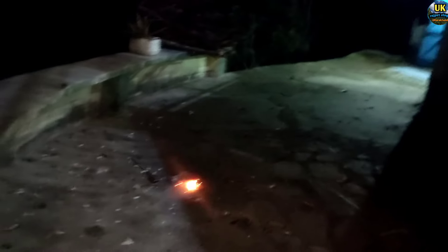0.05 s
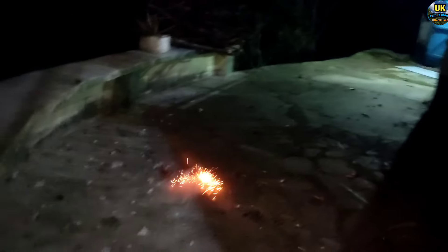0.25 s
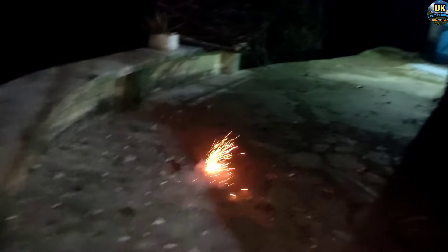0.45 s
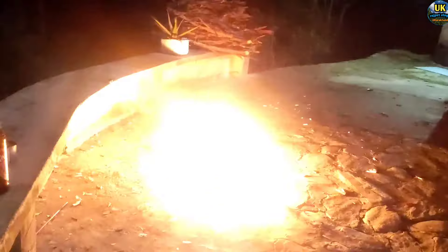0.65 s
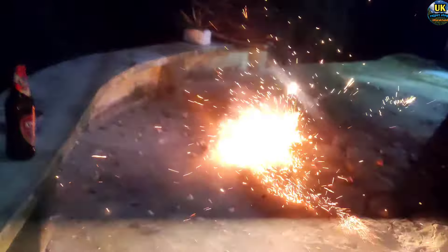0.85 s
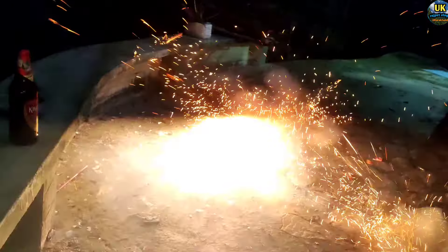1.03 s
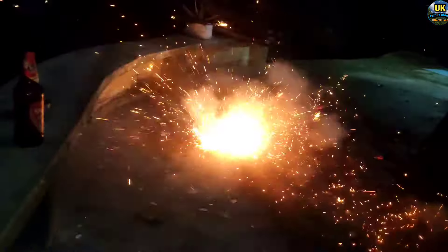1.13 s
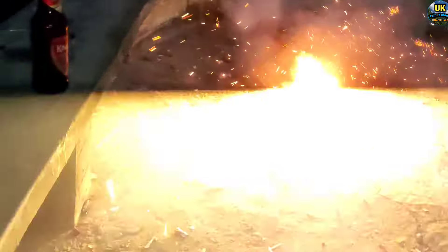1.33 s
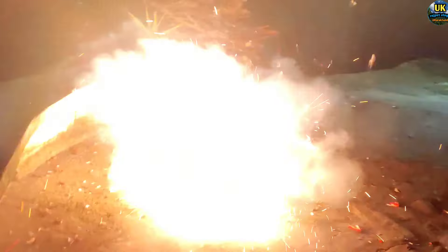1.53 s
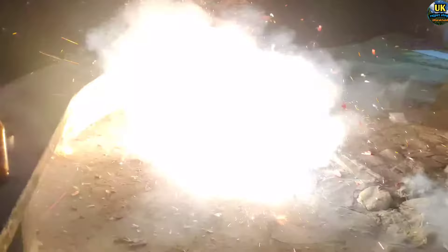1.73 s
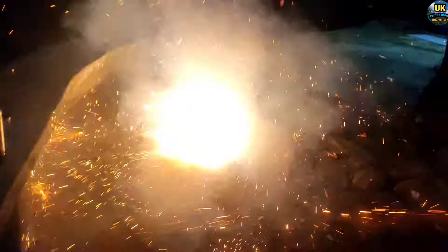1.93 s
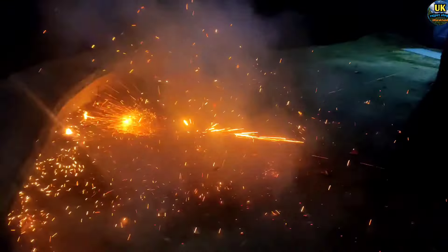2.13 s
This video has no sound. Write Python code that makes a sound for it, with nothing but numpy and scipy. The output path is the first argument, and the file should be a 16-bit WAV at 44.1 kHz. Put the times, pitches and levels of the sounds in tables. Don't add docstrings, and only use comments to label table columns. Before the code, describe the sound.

Firecracker bangs erupt suddenly after a near-silent fuse sputter, first a tight cluster, a brief gap, then evenly spaced heavy blasts, with hard slap echoes outdoors and a distorted, overloaded close phone microphone.

```python
import sys
import numpy as np
from scipy import signal
from scipy.fft import rfft, irfft
from scipy.io import wavfile
from scipy.ndimage import uniform_filter1d

SR = 44100
rng = np.random.default_rng(int(sys.argv[2]) if len(sys.argv) > 2 else 0)


def boost_factor(decibels):
    exponent = np.asarray(decibels, float) / 20
    return 10 ** exponent


def master_out(mix):
    frames = np.transpose(np.atleast_2d(mix))
    ceiling = np.clip(frames, -1, 1)
    pcm = np.round(ceiling * 32767).astype(np.int16)
    wavfile.write(sys.argv[1], SR, pcm)


N = 96226

BANDS_HZ = 28 * 2 ** np.arange(0, 9.3, .5)


def read(table, hz):
    points = np.array(table)
    return np.interp(np.log(hz), np.log(points[:, 0]), points[:, 1])


def split(x, colour, lag=0., peaks=()):
    hz = np.maximum(np.fft.rfftfreq(len(x), 1 / SR), 1)
    gain = boost_factor(read(colour, hz)) * (hz > 15) * (hz < 16400)
    for peak_hz, width_hz, db in peaks:
        gain = gain * boost_factor(db / (1 + (2 * (hz - peak_hz) / width_hz) ** 2))
    gain = gain / np.sqrt(np.mean(gain ** 2))
    place = np.clip(2 * np.log2(hz / BANDS_HZ[:, None]), -1, 1)
    place[-1] = np.minimum(place[-1], 0)
    spectrum = rfft(x) * gain * np.exp(-2j * np.pi * hz * lag / SR)
    return irfft(spectrum * np.cos(np.pi * place / 2) ** 2, len(x))


def pair(shared, own, colour, lag, peaks=()):
    # frequency in Hz, likeness of the two ports from 0 to 1.
    likeness = [(30, 0.58), (120, 0.82), (250, 0.84), (500, 0.85), (1200, 0.29), (3000, 0.13),
                (12000, 0.43)]
    alike = np.clip(read(likeness, BANDS_HZ), 0, 1)[:, None]
    ports = []
    for delay, own_noise in zip((lag, 0.), own):
        common = np.sqrt(alike) * split(shared, colour, delay, peaks)
        ports.append(common + np.sqrt(1 - alike) * split(own_noise, colour, 0., peaks))
    return np.array(ports)


def walk(rate, count):
    hold = int(SR / rate)
    steps = np.repeat(rng.standard_normal((count, N // hold + 1)), hold, axis=1)
    return 0.82 * uniform_filter1d(uniform_filter1d(steps, hold), hold)[:, :N]


def swarm(size):
    echoes_per_s, scatter_db = 15000, 2
    hit = rng.random((3, size)) < echoes_per_s / SR
    strength = rng.standard_normal((3, size)) * boost_factor(scatter_db * rng.standard_normal((3, size)))
    x = hit * strength
    return x / np.sqrt(np.mean(x ** 2))


def echo_decay(t, ring, tilt_db):
    # frequency in Hz, time to fall 60 dB in seconds.
    ring_times = [(30, 0.63), (160, 0.35), (420, 0.25), (1100, 0.27), (2900, 0.23), (7700, 0.28),
                  (15000, 0.13)]
    t60 = read(ring_times, BANDS_HZ)[:, None] * ring
    build_cycles, build_s, hold_s = 0.5, 0.0024, 0.018
    rise = 1 - np.exp(-t / (build_s + build_cycles / BANDS_HZ[:, None]))
    octave = np.log2(BANDS_HZ / 1000)[:, None]
    near = rise * boost_factor(-60 * np.maximum(t - hold_s, 0) / t60 + tilt_db * octave)

    wall_s, wall_db, wall_rise_s, wall_ring = 0.285, -16, 0.062, 2.68
    wall_body_hz, wall_tilt_db, bass_share = 1150, -3.5, 0.42
    off = np.log2(BANDS_HZ / wall_body_hz)[:, None]
    octaves_off = np.clip(np.maximum(off, -bass_share * off), 0, 3.8)
    late = np.maximum(t - wall_s, 0)
    fall_db = -60 * late / t60 / wall_ring
    far = (1 - np.exp(-late / wall_rise_s)) * boost_factor(wall_db + fall_db + wall_tilt_db * octaves_off)
    return near + far


def crack(t, tilt_db):
    hz = 2400 * (1 + 0.096 * rng.standard_normal())
    level_db, t60_s, left_db = -8, .02, -12
    tone = np.sin(2 * np.pi * hz * t) * boost_factor(level_db + tilt_db - 60 * t / t60_s)
    return tone * boost_factor(np.array([[left_db], [0]]))


def thump(t):
    level_db, rise_s, t60_s = 0.5, 0.031, 0.12
    turn = rng.random(3)
    hz = 33.8 * (.6 + turn[0])
    port_phase = (0.18 + 0.075 * turn[2]) * np.array([[0], [1]])
    swing = np.sin(2 * np.pi * (hz * t + turn[1] + port_phase))
    return swing * (1 - np.exp(-t / rise_s)) * boost_factor(level_db - 60 * t / t60_s)


def pressure_front(t, lag):
    front_s = 0.00118
    u = (t - np.array([[lag / SR], [0]])) / front_s
    suction = -np.exp(-np.maximum(u - 1, 0) / 2.4)
    return np.where(u < 0, 0, np.where(u < 1, u, suction))


def bang(db, ring, tilt_db, lag, size):
    # frequency in Hz, level in dB per Hz.
    bang_colour = [(15, -33), (25, -4.5), (145, -6), (714, 0.5), (1070, -3), (7110, -19.5), (9070, -25.5),
                   (14000, -22), (16000, -21)]
    # frequency in Hz, width in Hz, boost in dB.
    hollows = [(203, 36, 3), (368, 41, 6), (2130, 480, 3.5)]
    right_tilt_db, front_db = 1, -7.5
    t = np.arange(size) / SR
    octave = np.log2(BANDS_HZ / 1000)[:, None]
    side = boost_factor(np.array([-.5, .5])[:, None, None] * right_tilt_db * np.maximum(octave, 0))
    x = swarm(size)
    bands = pair(x[0], x[1:], bang_colour, lag, hollows)
    echoes = (bands * side * echo_decay(t, ring, tilt_db)).sum(axis=1)
    body = echoes + crack(t, tilt_db) + thump(t)
    return boost_factor(db) * (body + boost_factor(front_db - db) * pressure_front(t, lag))


def pop(db, pitch, size):
    # frequency in Hz, level in dB, time to fall 60 dB in seconds.
    hollow_rings = [(73, 5.5, 0.27), (122, 9.5, 0.066), (169.5, 2, .12), (378, -1, 0.24), (454, 6, 0.23),
                    (690, -25, 0.045), (920, -55, 0.065)]
    longest_s, snap_s = .09, .00035
    t = np.arange(size) / SR - .0018
    rings = np.zeros(size)
    for hz, ring_db, t60 in hollow_rings:
        decay = boost_factor(ring_db - 60 * t / min(t60, longest_s))
        rings -= decay * np.cos(2 * np.pi * hz * pitch * t - .6)
    rings = rings / np.abs(rings).max()
    push = 0.46 * (1 + t / 0.0023) ** 2
    return boost_factor(db) * uniform_filter1d(np.where(t < 0, push, rings), int(snap_s * SR / pitch))


def fuse():
    # frequency in Hz, level in dB per Hz.
    fuse_colour = [(180, -48), (300, -1), (385, 2), (455, -13), (787, 2), (14000, -11), (16000, -39)]
    # time in seconds, fuse level in dB.
    fizz = [
        (0.0, -65.5),
        (0.18, -72),
        (0.3, -52),
        (0.394, -75),
        (0.45, -72),
        (0.484, -61),
        (0.542, -73),
        (0.576, -63),
        (0.69, -77),
    ]
    x = rng.standard_normal((3, N))
    fizz_db = np.interp(np.arange(N) / SR, *np.array(fizz).T)
    sputter_db = 2.5 + 2.0 * walk(24.2, count=len(BANDS_HZ))
    return (pair(x[0], x[1:], fuse_colour, 6.5) * boost_factor(fizz_db + sputter_db)).sum(axis=1)


def night():
    # frequency in Hz, level in dB per Hz.
    night_colour = [(20, 8), (60, -11), (200, -4), (400, -1.5), (1000, -8.5), (1900, -5), (3200, -13),
                    (15000, -35.5)]
    # time in seconds, murmur level in dB.
    swell = [
        (0.0, -61),
        (0.136, -55.5),
        (0.28, -54.5),
        (0.42, -60),
        (0.526, -58),
        (0.53, -63),
        (0.576, -53.5),
        (0.646, -54),
        (0.69, -64.5),
    ]
    still_hz, still_db = 200, -51.5
    x = rng.standard_normal((3, N))
    swell_db = np.interp(np.arange(N) / SR, *np.array(swell).T)
    swell_db = np.where(BANDS_HZ[:, None] < still_hz, still_db, swell_db)
    flicker_db = 2.2 * walk(9, count=len(BANDS_HZ))
    return (pair(x[0], x[1:], night_colour, 0.) * boost_factor(swell_db + flicker_db)).sum(axis=1)


def scene():
    # start in seconds, level in dB over clipping, ring factor, tilt in dB per octave,
    # left lag in samples.
    bangs = [(0.704, -9, 0.65, -2, 6), (.7672, 2.5, 1, 0.5, 17.1), (0.9188, 5, 1, 0, 13),
             (.978, -3, 0.7, 2.5, 11.5), (1.02, -3.5, 0.75, 0.5, 13.3), (1.080, -6, 0.86, 1, 16.8),
             (1.3831, -1.5, 0.98, 0.5, 16.4), (1.534, 1, 1, 0.5, 16), (1.653, 2.5, 0.95, 0.5, 16.4),
             (1.766, 2, 0.99, 0.5, 15), (1.875, 2.5, 0.69, 0, 12.8), (2.019, 1, 0.99, 0.5, 10.9)]
    # start in seconds, level in dB, pitch factor.
    pops = [
        (.7022, 9, 1.0),
        (1.612, 1.5, 0.91),
        (2.129, -10.5, 1.32),
    ]
    right_db = 0.43
    size = 32768
    out = np.zeros((2, N + size))
    for s, db, ring, tilt_db, lag in bangs:
        i = int(s * SR)
        out[:, i:i + size] += bang(db, ring, tilt_db, lag, size=size)
    for s, db, pitch in pops:
        i = int(s * SR)
        out[:, i:i + size] += pop(db, pitch, size=size)
    balance = boost_factor(np.array([[-right_db], [right_db]]) / 2)
    return out[:, :N] * balance + fuse() + night()


def thin(x):
    spare_hz, spare_db, scatter_db = 4000, -12, 12
    top_hz, top_low_hz, fall_hz_per_db, full_db = 15600, 13300, 151, -45
    dip_hz, dip_width_hz, dip_db = 8300, 700, -4
    hz, _, z = signal.stft(x, SR, nperseg=1024)
    hz = hz[:512, None]
    strips = z[:, :512].reshape(2, 128, 4, -1)
    db = 10 * np.log10(np.mean(np.abs(strips) ** 2, axis=2) + 1e-18).max(axis=0)
    body_db = db[24:44].mean(axis=0)
    scatter = uniform_filter1d(rng.standard_normal(db.shape), size=5)
    strong = np.repeat(db > body_db + spare_db + scatter_db * scatter, 4, axis=0)
    top = np.clip(top_hz + fall_hz_per_db * (body_db - full_db), top_low_hz, top_hz)
    top = np.where(body_db < -80, top_hz, top)
    z[:, :512] *= (strong | (hz < spare_hz)) & (hz < top)
    z[:, :512] *= boost_factor(dip_db / (1 + (2 * (hz - dip_hz) / dip_width_hz) ** 2))
    return signal.istft(z, SR, nperseg=1024)[1][:, :N]


def duck(t):
    start_s, back_s, depth_db, edge_s = 1.374, 1.3835, -24, .0007
    return uniform_filter1d(boost_factor(depth_db * (t > start_s) * (t < back_s)), int(edge_s * SR))


def limit(x):
    threshold_db, smooth_s, ratio = -9, 0.002, 2.01
    keep = np.exp(-1 / (smooth_s * SR))
    power = signal.lfilter([1 - keep], [1, -keep], np.mean(x ** 2, axis=0))
    over_db = np.maximum(10 * np.log10(power + 1e-12) - threshold_db, 0)
    return x * boost_factor(-(1 - 1 / ratio) * over_db)


def overload(x):
    ceiling, knee = 1.0, 6
    return x / (1 + np.abs(x / ceiling) ** knee) ** (1 / knee)


def top_cut(x):
    return signal.sosfilt(signal.butter(12, 16410, fs=SR, output="sos"), x)


def record(dry):
    # time in seconds, offset in full scale.
    settle = [
        (0, 0),
        (1.1, 0),
        (1.2, .03),
        (1.37, -.13),
        (1.39, 0),
        (1.5, .04),
        (2.18, 0),
    ]
    t = np.arange(N) / SR
    drift = np.interp(t, *np.array(settle).T)
    x = overload(limit((dry + drift) * duck(t)))
    mix = np.clip(thin(x) * boost_factor(.3), -.96, .96)
    return top_cut(mix)


dry = scene()
out = record(dry)
master_out(out)
```